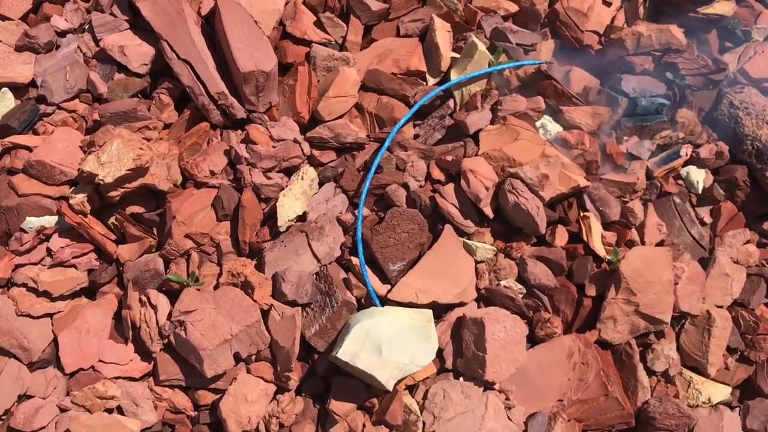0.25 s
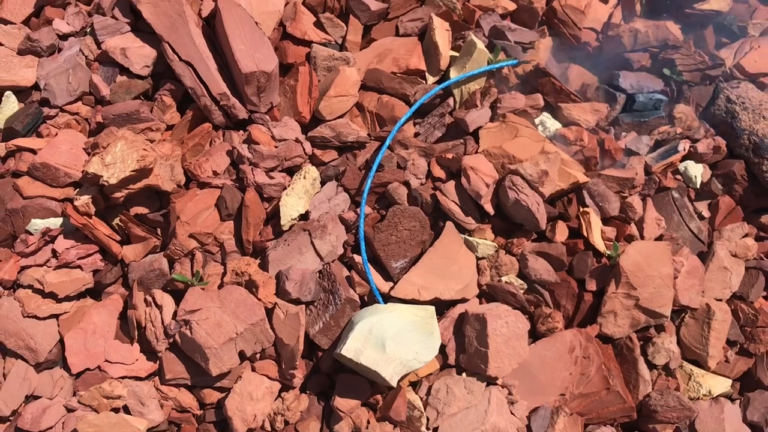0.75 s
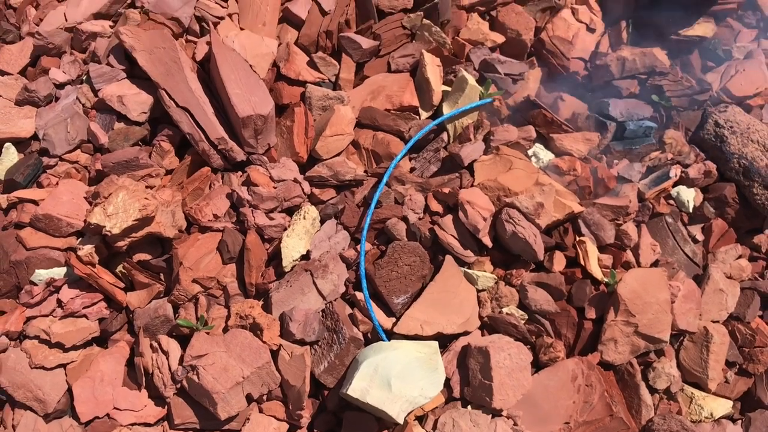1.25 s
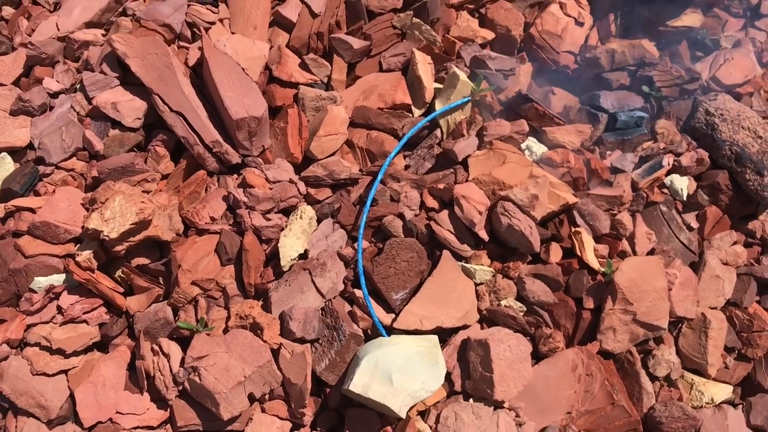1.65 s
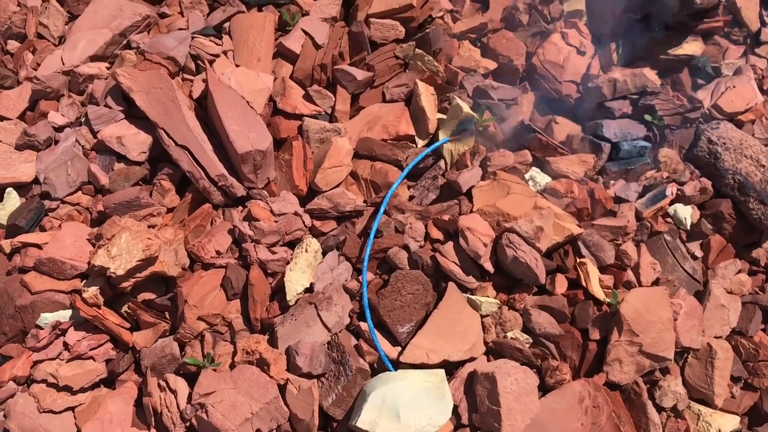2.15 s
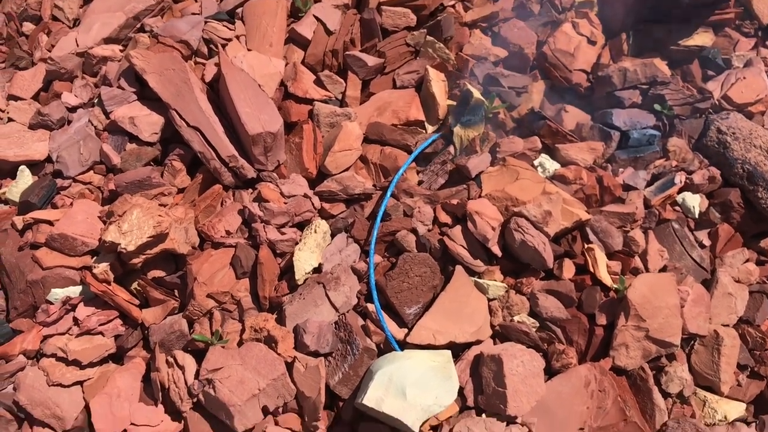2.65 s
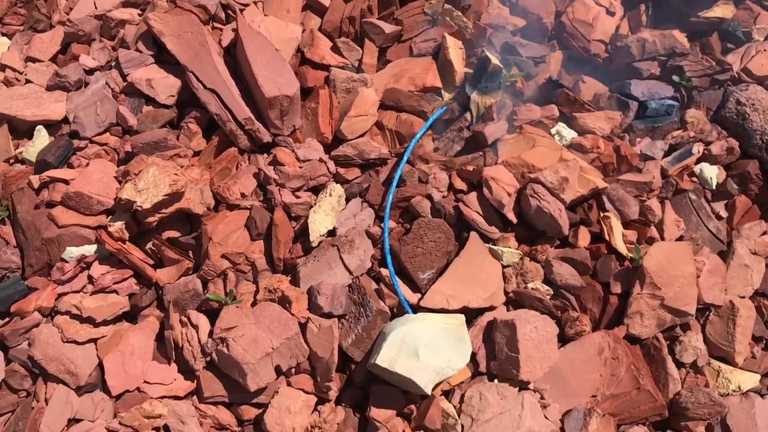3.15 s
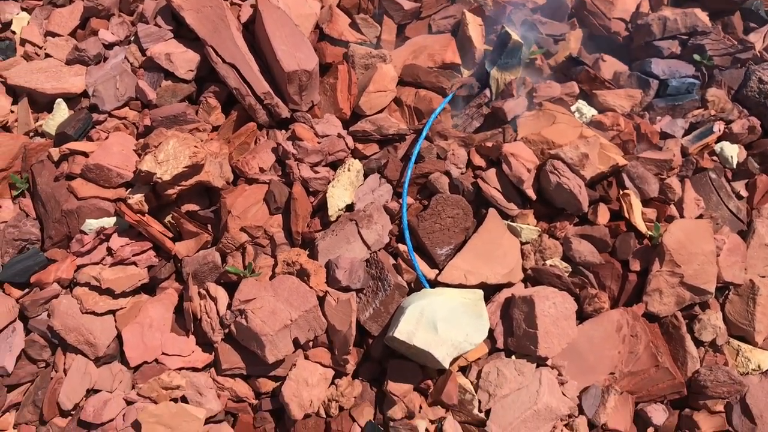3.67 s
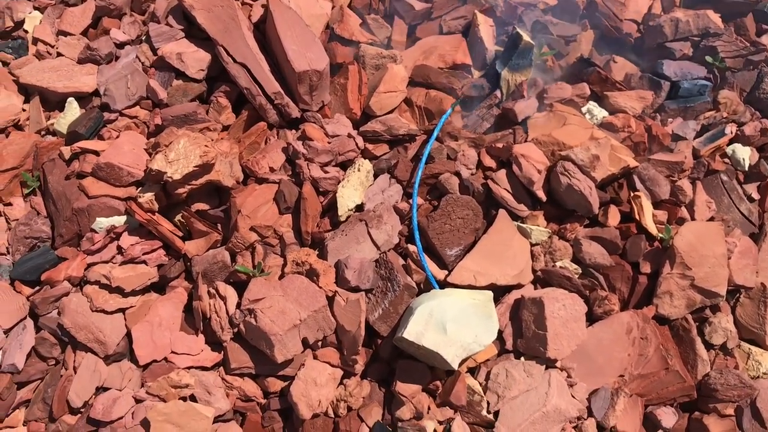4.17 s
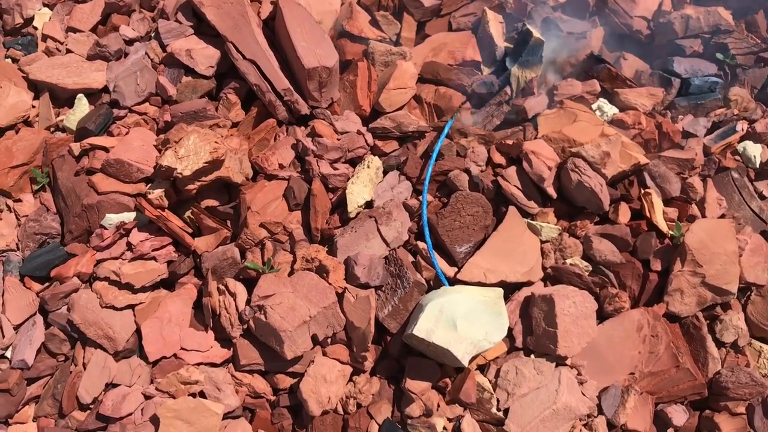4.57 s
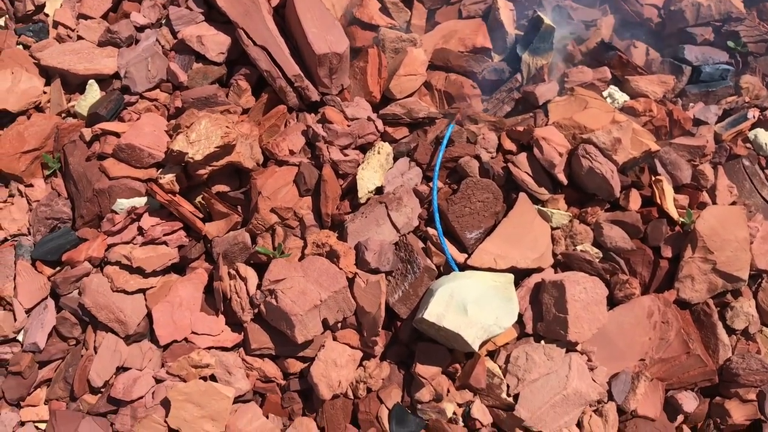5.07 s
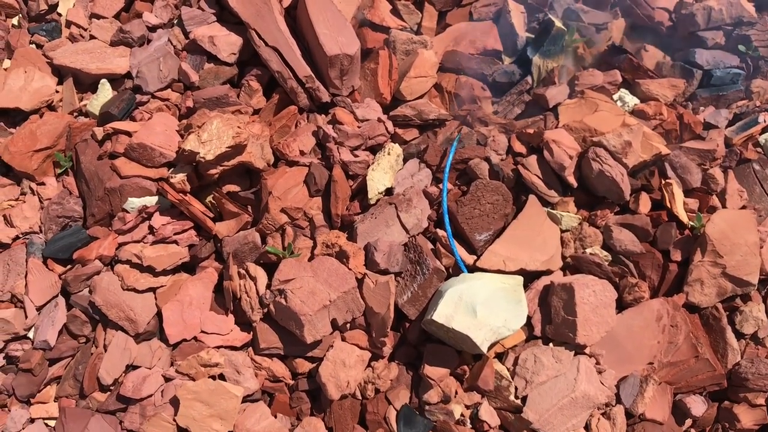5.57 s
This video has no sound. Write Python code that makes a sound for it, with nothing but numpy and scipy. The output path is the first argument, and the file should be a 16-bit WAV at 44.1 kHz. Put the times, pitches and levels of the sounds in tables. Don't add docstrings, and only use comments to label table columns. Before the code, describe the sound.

Constant airy fizzing of a burning fuse outdoors, calm at first, then joined by irregular low wind thumps that later thin out.

```python
import sys
import numpy as np
from scipy import signal
from scipy.fft import rfft, irfft, next_fast_len
from scipy.io import wavfile
from scipy.ndimage import uniform_filter1d, map_coordinates

SR = 44100
rng = np.random.default_rng(int(sys.argv[2]) if len(sys.argv) > 2 else 0)


def transcribe(signal):
    frames = np.atleast_2d(signal).T
    limited = np.clip(frames, -1, 1)
    pcm = np.round(limited * 32767).astype(np.int16)
    wavfile.write(sys.argv[1], SR, pcm)


def makeup_ratio(level_db):
    decades = np.asarray(level_db, float) / 20
    return 10 ** decades


N = 256662

# t/s, level/dB
JET_STRENGTH = [(0, -33), (.45, -32.5), (.75, -31), (.9, -33), (1.5, -30.5), (1.65, -30), (2.3, -31.5),
                (2.36, -34), (2.6, -32.5), (3.1, -34), (3.5, -31), (3.85, -33), (4.25, -31.5), (4.6, -33),
                (4.72, -29), (5.15, -32), (5.35, -31), (5.82, -32)]
# t/s, swell/dB (below 0 = dip), length/ms
SPUTTERS = [(.07, 3, 9.2), (.3, 3.5, 23), (.54, .5, 9.1), (.76, 0, 12), (1.34, 0, 15), (1.66, 0.5, 35),
            (2.25, 2, 40), (2.84, 0, 25), (2.91, 4.5, 29), (3.17, 2.5, 13), (3.33, 2, 19), (3.73, 1, 20),
            (4.07, -1, 14), (4.25, 1.5, 15), (4.67, -0.5, 16), (4.735, -1, 15), (4.86, -3, 18),
            (5.14, -1.5, 15), (5.22, 2.5, 9.8), (5.37, 1.5, 43), (5.6, 1, 19)]
# f/Hz, level per Hz/dB
JET_COLOUR = [(150, -33), (350, -16.5), (600, -3), (1000, 1.5), (2000, -1), (4000, -3), (11000, -5),
              (15700, -5.5)]
# start/s, end/s, first delay/ms, ripple/dB (below 0 = inverted)
STONE_FACES = [(-0.1, 0.44, 0.11, -2.0), (0.3, 1.6, 0.633, -0.5), (0.39, 0.95, 0.182, 1.5),
               (0.44, 0.91, 0.135, -1.0), (0.44, 2.95, 0.503, 0.7), (0.49, 2.81, 0.156, -0.5),
               (0.49, 3.0, 0.084, -1.6), (0.77, 1.6, 0.226, 1.5), (0.86, 2.35, 0.412, -0.5),
               (1.51, 3.0, 0.493, 1.1), (1.51, 3.83, 0.933, -0.4), (1.65, 2.48, 0.075, 1.0),
               (1.74, 2.58, 0.037, -3.5), (1.88, 2.16, 0.044, -1.4), (2.39, 3.69, 0.802, 0.5),
               (2.58, 2.86, 0.054, -1.7), (2.9, 3.18, 0.025, 1.4), (2.9, 4.57, 0.477, 0.5),
               (3.0, 4.11, 0.11, -1.4), (3.0, 4.39, 0.582, -1.0), (3.0, 5.04, 0.166, -2.7),
               (3.13, 4.44, 0.261, -0.8), (3.32, 5.36, 0.341, -0.9), (4.06, 4.9, 0.156, -1.0),
               (4.44, 5.55, 0.059, 0.9), (4.53, 5.64, 0.429, 1.1), (4.9, 5.18, 0.132, -1.3),
               (5.04, 5.41, 0.215, -1.0), (5.09, 5.9, 0.028, 1.6), (5.18, 5.9, 0.15, -2.6)]
# start/s, end/s, first f/Hz, last f/Hz, level/dB
HOLLOWS = [(-0.1, 0.44, 8190.0, 8190.0, 5.6), (-0.1, 1.37, 9840.0, 8860.0, 4.5),
           (0.26, 2.76, 10390.0, 10390.0, -4.5), (0.3, 0.95, 15000.0, 14550.0, -8.6),
           (0.35, 1.56, 5660.0, 5660.0, -4.1), (1.37, 3.88, 7530.0, 7530.0, -3.9),
           (1.6, 3.0, 8310.0, 8870.0, 5.3), (1.8, 2.95, 650.0, 800.0, -4.0),
           (2.11, 2.39, 15440.0, 15560.0, -7.3), (2.35, 2.9, 9820.0, 10040.0, -6.5),
           (2.35, 2.9, 13420.0, 13250.0, -8.8), (2.35, 3.37, 4560.0, 4560.0, 3.2),
           (2.9, 5.04, 11250.0, 12100.0, -2.7), (3.05, 4.2, 6850.0, 6450.0, -4.5),
           (3.3, 4.5, 800.0, 600.0, -3.0), (3.37, 3.92, 10930.0, 10210.0, -6.0),
           (3.4, 4.6, 5650.0, 4900.0, -6.3), (3.74, 5.5, 7210.0, 5970.0, 3.0),
           (3.83, 4.48, 14950.0, 14100.0, -5.9), (4.25, 5.9, 12540.0, 10540.0, -4.1),
           (4.3, 5.9, 5950.0, 5760.0, -5.5), (5.09, 5.9, 4060.0, 3580.0, -3.9),
           (5.2, 5.9, 9550.0, 9700.0, 5.5), (5.55, 5.9, 13930.0, 13620.0, -6.7)]
# f/Hz, level per Hz/dB
AIR_COLOUR = [(40, -26), (100, -18.5), (200, -2), (400, -5), (800, -7.5), (2000, -47)]
# t/s, level/dB
WIND_STRENGTH = [(0, -50), (1.1, -47.5), (1.6, -42), (1.85, -31), (2.22, -35), (2.6, -33.5), (2.75, -29),
                 (2.95, -37), (3.11, -27), (3.4, -39), (3.76, -26), (3.89, -37), (4.07, -27.5), (4.3, -40),
                 (4.75, -39.5), (4.93, -45), (5.25, -38.5), (5.82, -42)]
# f/Hz, level per Hz/dB
RUMBLE_COLOUR = [(15, -50), (30, -23), (50, 3), (70, -1), (110, -5), (160, -13.5), (300, -52), (600, -120)]
# f/Hz, level per Hz/dB
FLUTTER_COLOUR = [(50, -51), (100, -1.5), (150, 8), (250, 2), (400, -19), (700, -37), (1500, -120)]
# t/s, peak level/dB, swing f/Hz, spread/ms
BIG_EDDIES = [(1.36, -25.5, 107, 3.6), (1.628, -22, 61, 10), (1.645, -15.5, 118, 3.1),
              (1.888, -23.5, 93, 17.3), (1.94, -18, 196, 1.5), (1.949, -17.5, 109, 12.4),
              (2.02, -17, 74, 8), (2.059, -23, 128, 4), (2.302, -21.5, 73, 8.6), (2.44, -24, 119, 8.2),
              (2.727, -21, 143, 9), (2.75, -11, 160, 1.3), (2.789, -14, 109, 2.7), (2.889, -23.5, 190, 5.8),
              (2.932, -20, 173, 3.5), (3.061, -13, 202, 8.1), (3.095, -13.5, 230, 3.2),
              (3.145, -20.5, 133, 11), (3.207, -18, 139, 8.7), (3.283, -18, 81, 18), (3.485, -16, 136, 2.4),
              (3.511, -15.5, 105, 5.8), (3.704, -25, 99, 14), (3.736, -9.5, 105, 2.6),
              (3.816, -22.5, 76.6, 14), (3.924, -17.5, 88, 5.8), (4.02, -18, 130, 3.7),
              (4.44, -20.5, 137, 5.8), (4.823, -20, 72.4, 9), (5.049, -21.5, 61, 21)]
# t/s, peak level/dB, swing f/Hz
PUFFS = [(0.409, -37, 111), (1.397, -30, 132), (1.499, -28, 80.5), (1.703, -21, 61.4), (2.121, -26, 82),
         (2.237, -27, 106), (2.399, -34, 81), (2.492, -22.5, 80), (2.6, -40, 80), (2.766, -27, 320),
         (2.867, -23, 143), (3.042, -24, 157), (3.078, -19.5, 250), (3.275, -24, 298), (3.318, -23.5, 119),
         (3.41, -25.5, 118), (3.448, -28, 142), (3.6, -28, 90), (3.727, -20.5, 330), (3.98, -19.5, 81),
         (4.07, -20.5, 91), (4.111, -22, 91), (4.207, -30, 81), (4.42, -26, 157), (4.481, -28, 81),
         (4.684, -26, 72.4), (4.748, -24, 80), (5.243, -32, 67), (5.36, -24.5, 69), (5.556, -27, 55)]
# t/s, lowest f/Hz, highest f/Hz
WIDE_MOMENTS = [(.137, 11000, 13900), (.137, 14400, 15800), (.16, 12300, 13900), (.393, 8200, 9700),
                (.741, 4100, 5300), (.741, 9000, 11000), (1.136, 9000, 11000), (1.461, 8200, 9700),
                (1.461, 11000, 13200), (3.04, 6300, 7600), (4.085, 5200, 6300), (4.085, 7000, 9000),
                (4.549, 5700, 7000), (5.153, 8300, 11000), (5.246, 5200, 6300), (5.246, 14400, 15800),
                (5.431, 5700, 7000)]

CREEP_MS_PER_S = 0.02
HOLLOW_WIDTH_HZ = 230
FLUTTER_DB, FLUTTER_GROWS, CALM_DB = -19.5, 1.16, -37
WAKE_DB, WAKE_S, WAKE_DB_PER_OCT = -25.5, 0.035, 6.5
PUFF_CYCLES = 0.58
EDGE_DB, EDGE_DB_PER_OCT, EDGE_GROWS = -26, 11, 0.97


def unit(x):
    return x / np.sqrt(np.mean(x ** 2) + 1e-20)


def bump(t, middle, spread):
    return np.exp(-0.5 * ((t - middle) / spread) ** 2)


def along(points, hz):
    f, level = np.transpose(points)
    return np.interp(np.log(hz + 1), np.log(f + 1), level)


def curve(rows):
    s, level = np.transpose(rows)
    return np.interp(np.arange(N) / SR, s, level)


def wobble(rate):
    knots = rng.standard_normal(N // 200)
    return map_coordinates(knots, [np.arange(N) * min(rate, 200) / SR])


def patches(shape, bins, frames):
    field = uniform_filter1d(rng.standard_normal(shape), size=bins, axis=0)
    return unit(uniform_filter1d(field, size=frames, axis=1))


def filtered(x, response):
    m = next_fast_len(N + 8192)
    return irfft(rfft(x, m) * response(np.fft.rfftfreq(m, 1 / SR)), m)[:N]


def noise(colour):
    return unit(filtered(rng.standard_normal(N), lambda hz: makeup_ratio(along(colour, hz))))


def stones(hz, t, edge_s=0.035):
    def near(start, end):
        return (1 + np.tanh((t - start) / edge_s)) * (1 + np.tanh((end - t) / edge_s)) / 4

    faces_db = 0
    for start, end, first_ms, db in STONE_FACES:
        delay_ms = first_ms + CREEP_MS_PER_S * (t - max(start, 0))
        faces_db = faces_db + db * near(start, end) * np.cos(2 * np.pi * hz * delay_ms / 1000)
    hollows_db = 0
    for start, end, first_hz, last_hz, db in HOLLOWS:
        centre_hz = np.interp(t, [start, end], [first_hz, last_hz])
        shape = bump(hz, centre_hz, HOLLOW_WIDTH_HZ)
        core = 0.17 * (db < 0) * bump(hz, centre_hz, HOLLOW_WIDTH_HZ / 3)
        hollows_db = hollows_db + db * near(start, end) * shape + core * near(start, end) * db
    return 1.03 * faces_db + 1.18 * hollows_db


def fuse(grit_db=0.7, dance_db=0.73, flicker_db=0.22):
    hz, t, z = signal.stft(rng.standard_normal(N), SR, nperseg=512)
    patchy_db = grit_db * patches(z.shape, 2, 30) + dance_db * patches(z.shape, 40, 9)
    gain = makeup_ratio(along(JET_COLOUR, hz)[:, None] + stones(hz[:, None], t[None]))
    gain = gain / np.sqrt(np.mean(gain ** 2, axis=0))
    hiss = unit(signal.istft(z * gain * makeup_ratio(patchy_db), SR, nperseg=512)[1][:N])
    now = np.arange(N) / SR
    swell_db = sum(db * bump(now, s, ms / 1000) for s, db, ms in SPUTTERS)
    unsteady_db = flicker_db * wobble(16) + 0.62 * wobble(60) + 0.41 * wobble(150)
    return hiss * makeup_ratio(curve(JET_STRENGTH) + swell_db + unsteady_db)


def distant_air():
    return makeup_ratio(-49) * noise(AIR_COLOUR)


def wind():
    strength_db, now = curve(WIND_STRENGTH), np.arange(N) / SR
    wake = 0
    for s, db, hz, ms in BIG_EDDIES:
        wake_db = db + WAKE_DB + WAKE_DB_PER_OCT * np.log2(hz / 100)
        wake = wake + makeup_ratio(wake_db) * bump(now, s, WAKE_S)
    lumps = wobble(24)
    rumble = makeup_ratio(strength_db - 1) * unit(makeup_ratio(3.4 * lumps) * noise(RUMBLE_COLOUR))
    steady = makeup_ratio(CALM_DB + FLUTTER_DB + FLUTTER_GROWS * (strength_db - CALM_DB))
    flutter = unit(makeup_ratio(0.75 * lumps + 2.7 * wobble(40)) * noise(FLUTTER_COLOUR))
    return rumble + (steady + wake) * flutter


def thumps(sweep=0.55):
    half = SR // 8
    out, t = np.zeros(N + SR), np.arange(-half, half) / SR
    edges = noise([(150, -38), (260, 1.5), (320, -3.5), (450, -11.5), (750, -24.5), (1300, -40)])
    eddies = BIG_EDDIES + [(s, db, hz, 1000 * PUFF_CYCLES / hz) for s, db, hz in PUFFS]
    chances = rng.uniform(-1.13, 1, (len(eddies), 2))
    for (s, db, hz, ms), (turn, bend) in zip(eddies, chances):
        spread = max(ms, 1.5) / 1000
        bent_t = t + sweep * bend * t ** 2 / spread / 2
        swing = bump(t, 0, spread) * np.cos(np.pi * turn + 2 * np.pi * hz * bent_t)
        slow = min(65 / hz, 1)
        shove = (1 - slow) * bump(t, 0, 0.0084) * np.cos(np.pi * turn + 2 * np.pi * 65 * t)
        start = round(s * SR) - half
        edge = edges[start:][:len(t)] * bump(t, 0, spread + 0.0017)
        edge_db = EDGE_DB + EDGE_DB_PER_OCT * np.log2(hz / 100) + EDGE_GROWS * (db + 19.5)
        out[start:][:len(t)] += makeup_ratio(db) * (swing + makeup_ratio(-6.5) * shove + makeup_ratio(edge_db) * edge)
    return filtered(out[:N], lambda hz: hz ** 2 / (hz ** 2 + 40 ** 2))


def scene():
    mono = fuse() + distant_air() + wind() + thumps()
    return np.tile(mono, (2, 1))


def top_cut(x):
    return signal.sosfilt(signal.butter(12, 16780, fs=SR, output="sos"), x)


def record(dry):
    mono = filtered(dry[0], lambda hz: hz < 15730)
    other = np.roll(mono, 4000)
    side = np.zeros(N)
    for s, low_hz, high_hz in WIDE_MOMENTS:
        fade = np.cos(np.pi / 2 * np.clip((np.arange(N) - s * SR) / 960, -1, 1)) ** 1.3
        side += fade * filtered(other, lambda hz: (hz > low_hz) & (hz < high_hz))
    side = makeup_ratio(-3.5) * side
    return top_cut(np.array([mono + side, mono - side]))


dry = scene()
out = record(dry)
transcribe(out)
```